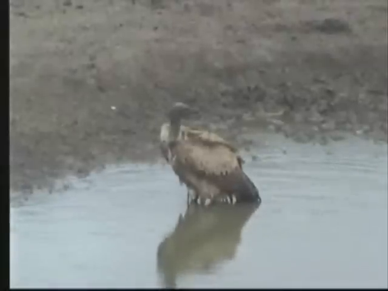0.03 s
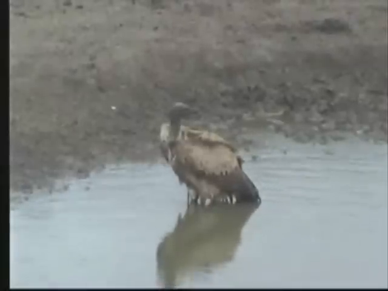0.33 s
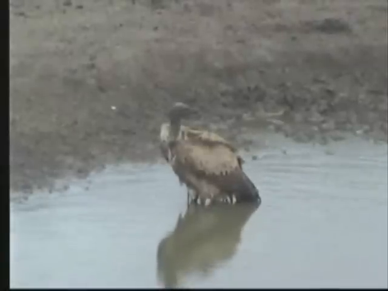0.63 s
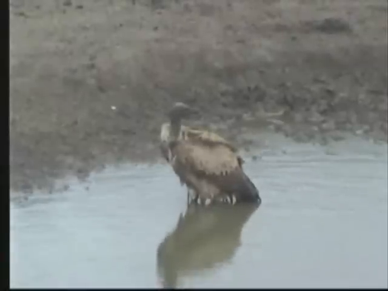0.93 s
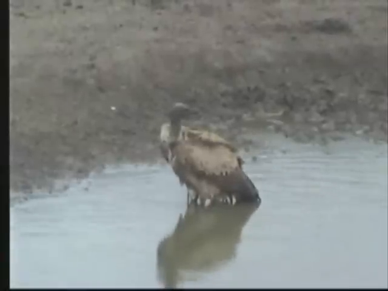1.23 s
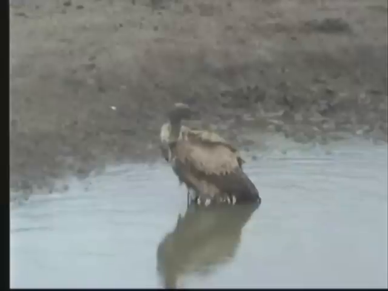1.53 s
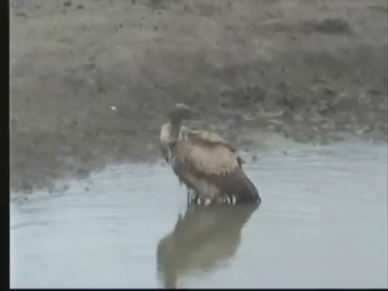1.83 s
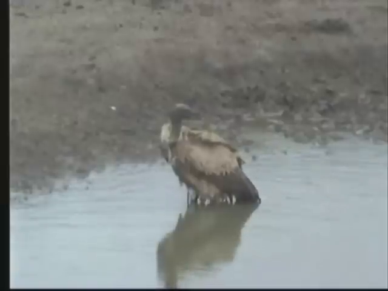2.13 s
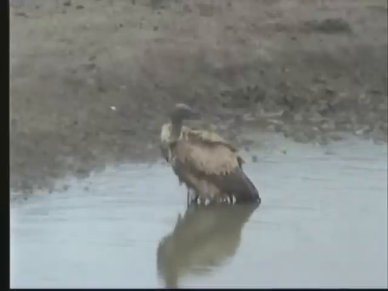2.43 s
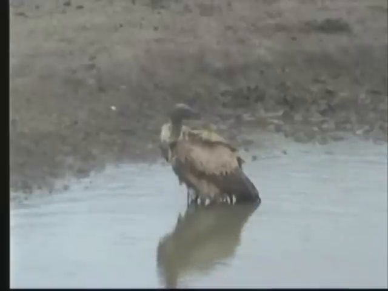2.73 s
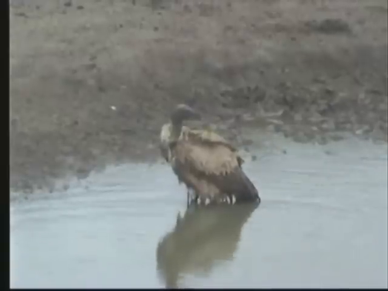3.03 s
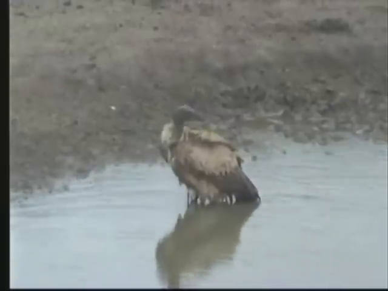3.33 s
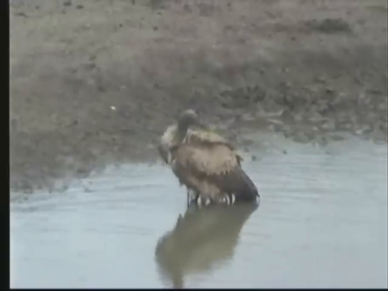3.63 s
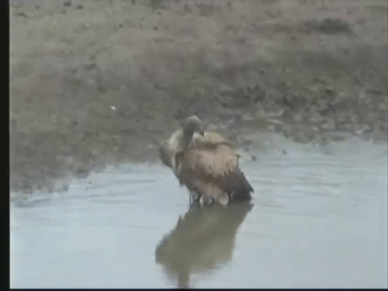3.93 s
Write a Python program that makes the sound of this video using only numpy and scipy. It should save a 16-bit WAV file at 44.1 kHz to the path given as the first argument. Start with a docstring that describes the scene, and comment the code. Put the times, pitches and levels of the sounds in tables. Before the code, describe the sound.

A harsh two-note bird call sounds twice over faint chirps and a quiet rumble.

```python
"""At a muddy waterside a bird out of sight gives a harsh two-note call, twice. Both sides of its
syrinx sound at once on unrelated pitches and modulate each other; the throat favours the partials
near 3.3 kHz. Far birds chirp and one dry tick sounds; ground and banks scatter the calls and the tick.
A hollow rumble swells and flutters, and a camera adds hum and hiss."""
import sys
import numpy as np
from scipy import signal
from scipy.fft import rfft, irfft
from scipy.io import wavfile
from scipy.ndimage import uniform_filter1d

SR = 44100
rng = np.random.default_rng(int(sys.argv[2]) if len(sys.argv) > 2 else 0)


def output_pcm(signal):
    """Save a mono or channel-first signal as 16-bit PCM at the path in sys.argv[1].

    Samples are clipped to [-1, 1] before scaling.
    """
    pcm = np.clip(np.atleast_2d(signal).T, -1, 1) * 32767
    wavfile.write(sys.argv[1], SR, np.round(pcm).astype(np.int16))


N = 176400
T = np.arange(N) / SR

# One list per note. Each row: time in seconds, low voice in Hz, high voice in Hz.
NOTE_PITCHES = [
    [(1.486, 1332, 1870), (1.495, 1520, 2012), (1.505, 1574, 2060), (1.515, 1492, 2063),
     (1.523, 1443, 1870), (1.531, 1315, 1775), (1.542, 1382, 1910), (1.55, 1330, 2070), (1.562, 1345, 2280)],
    [(1.618, 1374, 2088), (1.626, 1584, 2080), (1.641, 1700, 2280), (1.655, 1546, 2335),
     (1.663, 1488, 2218), (1.671, 1417, 2030), (1.684, 1483, 2334), (1.692, 1450, 2444),
     (1.702, 1260, 2370)],
    [(3.41, 1319, 1986), (3.418, 1504, 1904), (3.427, 1628, 2058), (3.442, 1527, 2100), (3.454, 1380, 1864),
     (3.463, 1261, 1810), (3.474, 1403, 2065), (3.482, 1426, 2315), (3.492, 1300, 2320)],
    [(3.544, 1347, 2016), (3.553, 1590, 2084), (3.562, 1680, 2274), (3.573, 1765, 2442),
     (3.585, 1602, 2220), (3.595, 1461, 2185), (3.607, 1484, 2293), (3.617, 1456, 2510), (3.63, 1400, 2694)],
]
# One list per note. Each row: time in seconds, relative level in dB.
NOTE_LEVELS = [
    [(1.482, -27), (1.486, -48.5), (1.508, -35.5), (1.552, -42), (1.57, -54)],
    [(1.614, -40.5), (1.626, -38), (1.656, -34.5), (1.666, -41), (1.692, -38), (1.71, -58)],
    [(3.407, -36), (3.413, -43.5), (3.439, -37), (3.467, -43), (3.483, -38.5), (3.5, -45)],
    [(3.54, -40), (3.55, -37.5), (3.574, -32), (3.596, -39.5), (3.616, -36), (3.64, -51)],
]
# Each row: one partial's multiple of the low voice, its multiple of the high voice.
PARTIAL_ORDERS = [(1, 0), (0, 1), (2, 0), (1, 1), (0, 2), (3, 0), (2, 1), (-1, 2), (3, -1)]
# Each row: one note's relative partial levels in dB, before the throat.
PARTIAL_LEVELS_DB = [
    [-0.9, -0.78, 0, -4.5, -5.5, -15, -4.5, -32, -31],
    [1, 1, 1, 0.5, -4, -4, 0.5, -9, -8],
    [1, -1.6, 0, -4, -5.5, -20, -3.5, -24, -14],
    [-1.5, 0, 0, -3.5, -6, -10, -9, -16, -25],
]
# Throat response and turbulence spectrum. Each row: frequency in Hz, gain in dB.
THROAT_RESPONSE = [(1200, -24), (1600, -12.5), (2000, -15), (2250, -10.5), (2550, -0.5), (2900, -2.5),
                   (3400, 3.5), (4000, 0), (4600, -7), (5300, -14.5), (6000, -21)]
RASP_SPECTRUM = [(1100, -28), (1600, -8), (2100, -9), (2700, 8.5), (3500, 3), (4300, 5), (5300, 2),
                 (5700, -4), (6100, -53.5)]
CALL_GAIN_DB, RASP_DB, SCRATCH_DB = -1, -20.5, -0.5
JITTER_FRACTION, SHIMMER_DB, WANDER_HZ = 0.012, 2, 293
GLIDE_S, OPEN_S, SCRATCH_DECAY_S = 0.0017, 0.005, 0.0065
VOICE_RISE_S, VOICE_FALL_S = 0.018, 0.0084

def harsh_note(pitches, levels, partials_db):
    """Two unsteady syrinx voices, their overtones and sum and difference tones, shaped by the throat."""
    span = (T >= levels[0][0]) & (T <= levels[-1][0])
    t = T[span]
    glides_hz = [uniform_filter1d(hz, int(GLIDE_S * SR)) for hz in curve(pitches, t)]
    low_hz, high_hz = [hz * (1 + JITTER_FRACTION * drift(WANDER_HZ)[span]) for hz in glides_hz]
    voice, power = 0, 0
    for (m, n), db in zip(PARTIAL_ORDERS, partials_db):
        hz = m * low_hz + n * high_hz
        gain = from_db(db) * gain_at(THROAT_RESPONSE, hz)
        shimmer = from_db(SHIMMER_DB * drift(WANDER_HZ)[span])
        voice += gain * shimmer * tone(hz)
        power += gain ** 2 / 2
    lock_in = (t - pitches[0][0]) / VOICE_RISE_S
    let_go = (pitches[-1][0] - t) / VOICE_FALL_S
    voicing = np.clip(np.minimum(lock_in, let_go) + 0.5, 0, 1)
    scratch = from_db(SCRATCH_DB) * np.exp(-(t - t[0]) / SCRATCH_DECAY_S)
    turbulence = (from_db(RASP_DB) + scratch) * noise(RASP_SPECTRUM)[span]
    envelope = np.clip((t - t[0]) / OPEN_S, 0, 1) * from_db(CALL_GAIN_DB + curve(levels, t)[0])
    note = np.zeros(N)
    note[span] = envelope * (voicing * voice / np.sqrt(power) + turbulence)
    return note


# Each row: start in seconds, length in seconds, start pitch in Hz, end pitch in Hz, relative level in dB.
FAR_CHIRPS = [(0.092, 0.14, 3900, 3740, -68), (0.66, 0.034, 3300, 2790, -53), (0.7, .022, 3250, 3170, -59),
              (0.721, .02, 2850, 3040, -58), (.742, .016, 3400, 3670, -48),
              (0.755, 0.0095, 3200, 3360, -49), (0.763, 0.01, 3200, 3080, -55),
              (1.254, 0.037, 5900, 5700, -71), (1.893, .06, 2620, 2576, -62),
              (1.996, 0.037, 2600, 2640, -60), (2.103, 0.053, 2600, 2580, -58.5),
              (2.165, 0.093, 2600, 2920, -63.5), (2.314, 0.11, 2620, 2650, -65.5),
              (2.456, 0.028, 2560, 2460, -61.5), (2.555, 0.04, 2600, 2560, -63),
              (2.667, 0.038, 2580, 2530, -60), (2.732, 0.115, 2500, 2620, -66.5),
              (2.729, 0.016, 4000, 3970, -61.5), (2.753, .014, 4020, 4000, -67),
              (2.89, 0.033, 4030, 3990, -65), (2.928, 0.027, 5850, 5900, -72)]
# Each row: start in seconds, length in seconds, relative level in dB.
FAR_LISPS = [(0.473, 0.11, -70), (2.045, 0.03, -65), (2.1, 0.024, -56), (2.144, .04, -77)]
# Each row: frequency in Hz, gain in dB.
LISP_SPECTRUM = [(2500, -36), (3800, -10), (4300, -2), (5500, -14), (6500, -8.5), (7500, -46)]
WAVER_FRACTION, WAVER_HZ = 0.035, 229

def far_birds():
    """Short wavering whistles and a few thin, hissing calls."""
    waver = 1 + WAVER_FRACTION * drift(WAVER_HZ)
    whistles = 0
    for start, length, start_hz, end_hz, db in FAR_CHIRPS:
        hz = np.interp(T, [start, start + length], [start_hz, end_hz]) * waver
        whistles += from_db(db) * swell(start, length) * tone(hz)
    lisp_envelope = sum(from_db(db) * swell(start, length) for start, length, db in FAR_LISPS)
    return whistles + lisp_envelope * noise(LISP_SPECTRUM)


# Each row: frequency in Hz, gain in dB.
TICK_SPECTRUM = [(500, -14), (1200, 9), (2200, -3), (3500, -2), (6000, -6), (7500, -41)]

def tick(start_s=0.742, level_db=-43, decay_s=0.0018):
    """A dry snap that dies within milliseconds."""
    envelope = (T >= start_s) * np.exp(-np.abs(T - start_s) / decay_s)
    return from_db(level_db) * envelope * noise(TICK_SPECTRUM)


# Each row: time in seconds, relative level in dB.
RUMBLE_LEVELS = [(0.0, -81), (0.32, -57), (0.34, -65), (0.63, -50.5), (0.76, -59.5), (0.82, -49.5),
                 (0.88, -61.5), (0.99, -56), (1.28, -57.5), (1.32, -50), (1.39, -60), (1.44, -50.5),
                 (1.49, -60), (1.57, -48.5), (1.66, -46.5), (1.93, -58.5), (1.99, -52), (2.16, -51.5),
                 (2.18, -45.5), (2.24, -51), (2.29, -46), (2.35, -57), (2.48, -47.5), (2.67, -53),
                 (3.31, -45.5), (3.34, -59.5), (3.56, -54.5), (3.62, -62.5), (3.85, -57), (4.0, -48.5)]
RUSH_LEVELS = [(0, -97), (.62, -66), (1.0, -70), (1.45, -65), (1.75, -59), (2.1, -67.5), (2.3, -62),
               (2.55, -65), (2.68, -60), (2.88, -64), (3.3, -58.5), (3.45, -65.5), (3.75, -74.5),
               (4, -68.5)]
# Each row: frequency in Hz, gain in dB.
RUMBLE_SPECTRUM = [(150, -19.5), (300, -16), (400, -7.5), (480, -1), (580, 0.5), (660, -3), (760, -13.5),
                   (1000, -22.5), (2000, -52)]
RUSH_SPECTRUM = [(400, -4.5), (800, 0), (1100, -1.5), (1600, -2), (2200, -9), (4000, -31.5)]

def rumble(hollow_gain_db=-0.5, flutter_db=1, flutter_hz=35.8):
    """A fluttering hollow noise band near 570 Hz with a soft rush above it."""
    band = rms_one(noise(RUMBLE_SPECTRUM) * from_db(flutter_db * drift(flutter_hz)))
    hollow = from_db(hollow_gain_db + curve(RUMBLE_LEVELS)[0]) * band
    rush = from_db(curve(RUSH_LEVELS)[0]) * noise(RUSH_SPECTRUM)
    return hollow + rush


# Each row: start in seconds, length in seconds, rms level at the crest in dB.
RUMBLE_PUFFS = [(.612, .011, -44), (2.269, .01, -40), (2.291, .016, -40), (2.903, .014, -45)]

def puffs(resonance_hz=580):
    """Brief surges of the rumble's resonance."""
    return sum(swell(start, length) * steady_tone(resonance_hz, db) for start, length, db in RUMBLE_PUFFS)


# Each row: frequency in Hz, rms level in dB.
HUM_PARTIALS = [(50, -65), (100, -71.5), (150, -57), (250, -63), (350, -68.5)]
# Each row: frequency in Hz, gain in dB.
FLOOR_SPECTRUM = [(20, -5.5), (60, -9.5), (120, -2.5), (200, 1), (320, -5), (550, -1.5), (800, -11),
                  (1200, -22.5), (2500, -19.5), (4500, -19), (6000, -20.5), (7000, -22.5)]
HISS_SPECTRUM = [(25, 19), (120, 23.5), (300, 15.5), (700, 3), (1500, -3.5), (7000, -4), (11500, -2),
                 (13000, -7.5)]

def camera(whine_hz=4589, whine_db=-78, floor_db=-56, floor_top_hz=6955, hiss_db=-67):
    """Steady hum, a thin whine and a noise floor, with a faint separate hiss in each channel."""
    hum = sum(steady_tone(hz, db) for hz, db in HUM_PARTIALS)
    whine = steady_tone(whine_hz, whine_db)
    floor = from_db(floor_db) * low_pass(noise(FLOOR_SPECTRUM), floor_top_hz)
    hiss = from_db(hiss_db) * np.array([noise(HISS_SPECTRUM), noise(HISS_SPECTRUM)])
    return hum + whine + floor + hiss


# Return from leaves and stones. Each row: frequency in Hz, gain in dB.
SCATTER_SPECTRUM = [(1200, 8), (3200, -4), (4400, 0.5), (5400, 11), (6500, 2)]

def scatter(x, t60_s, delay_s=0.012):
    """Diffuse, dying reflections from the ground and bushes."""
    t = T[:SR]
    tail = noise(SCATTER_SPECTRUM)[:SR] * from_db(-60 * t / t60_s) * (t > delay_s)
    return signal.fftconvolve(x, tail / np.sqrt(np.sum(tail ** 2)))[:N]


def from_db(db):
    return 10 ** (np.asarray(db) / 20)


def rms_one(x):
    return x / np.sqrt(np.mean(x ** 2) + 1e-20)


def curve(rows, t=T):
    """Each column after the first, joined by straight lines in time."""
    times, *columns = np.transpose(rows)
    return [np.interp(t, times, column) for column in columns]


def gain_at(spectrum, hz):
    """Linear gain, interpolated in dB over log frequency."""
    points_hz, db = np.transpose(spectrum)
    return from_db(np.interp(np.log(np.maximum(hz, 1)), np.log(points_hz), db))


def noise(spectrum):
    """Unit-rms noise with the given spectrum."""
    hz = np.fft.rfftfreq(N, 1 / SR)
    return rms_one(irfft(rfft(rng.standard_normal(N)) * gain_at(spectrum, hz), N))


def drift(corner_hz):
    """Smooth unit-rms random wander."""
    hz = np.fft.rfftfreq(N, 1 / SR)
    return rms_one(irfft(rfft(rng.standard_normal(N)) / (1 + (hz / corner_hz) ** 2), N))


def tone(hz):
    """Sine following a pitch curve."""
    return np.sin(2 * np.pi * np.cumsum(hz) / SR)


def steady_tone(hz, rms_db):
    """Sine with a random phase."""
    return np.sqrt(2) * from_db(rms_db) * np.sin(2 * np.pi * (hz * T + rng.random()))


def swell(start_s, length_s):
    """Half-sine envelope."""
    return np.sin(np.pi * np.clip((T - start_s) / length_s, 0, 1))


def low_pass(x, hz):
    return signal.sosfilt(signal.ellip(10, 0.2, 70, hz, fs=SR, output="sos"), x)


FAR_DRY_DB, FAR_SEND_DB = 0.5, -0.5
NEAR_TO_GROUND_DB, NEAR_TO_BANKS_DB = -8.5, -13

def scene():
    """All sources sit in the centre; the far birds are heard mostly through the scatter."""
    calls = sum(harsh_note(*note) for note in zip(NOTE_PITCHES, NOTE_LEVELS, PARTIAL_LEVELS_DB))
    near = calls + tick()
    far = far_birds()
    far_send = from_db(FAR_SEND_DB) * far
    ground = scatter(from_db(NEAR_TO_GROUND_DB) * near + far_send, t60_s=0.23)
    banks = scatter(from_db(NEAR_TO_BANKS_DB) * near + far_send, t60_s=0.56)
    return near + from_db(FAR_DRY_DB) * far + ground + banks + rumble() + puffs() + camera()


def record(dry):
    """Steep cut of the top treble."""
    return low_pass(dry, hz=12400)


dry = scene()
out = record(dry)
output_pcm(out)
```